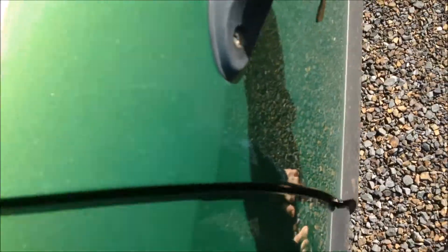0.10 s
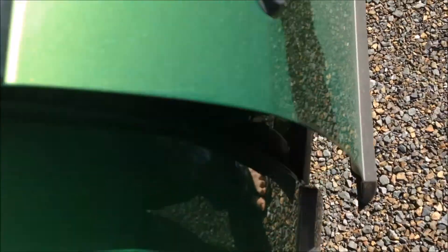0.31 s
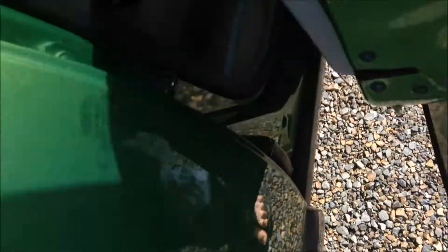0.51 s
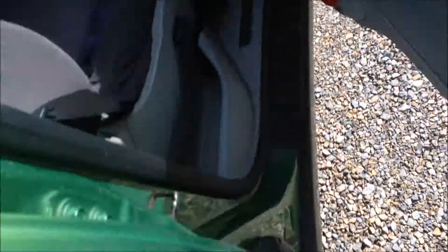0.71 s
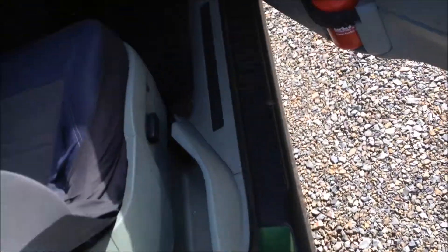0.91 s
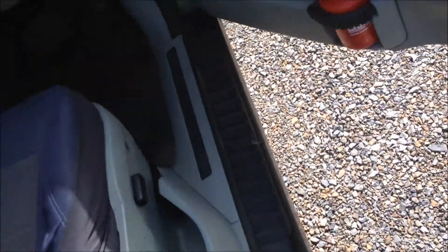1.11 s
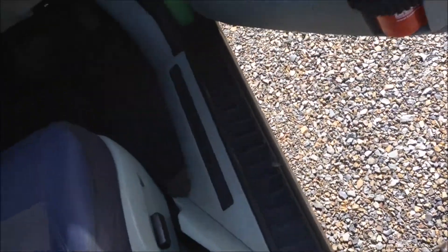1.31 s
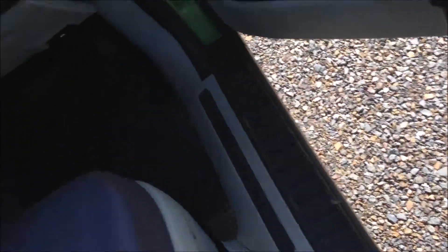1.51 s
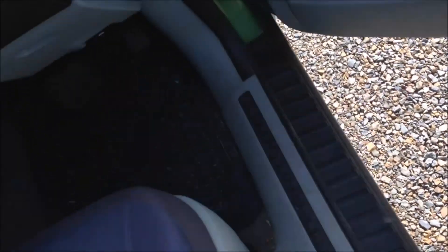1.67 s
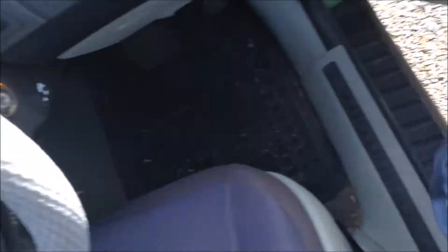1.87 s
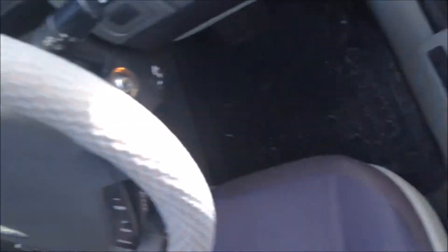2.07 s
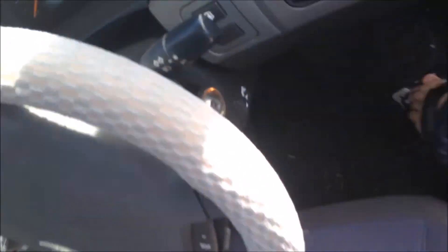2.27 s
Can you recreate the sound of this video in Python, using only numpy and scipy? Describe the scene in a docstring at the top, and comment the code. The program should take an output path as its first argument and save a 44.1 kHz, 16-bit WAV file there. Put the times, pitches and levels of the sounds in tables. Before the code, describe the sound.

A car door opens close by: light handle ticks, a loud hollow thump with a sharp latch snap, then two gravel crunches, soft bumps of climbing in, a brief key clink and faint cloth, outdoors, close mono microphone.

```python
"""First a car door handle ticks close by, then the door pops free with a hollow thump and the latch snaps.
Two steps crunch on gravel, soft bumps follow as someone climbs in, keys clink and clothing slides,
all over a faint outdoor background.
Knocks are short pushes that set damped tones ringing. Scrapes, crunches, clinks and cloth are grains
or noise, shaped in loudness and colour; the outdoor air is steady coloured noise."""
import sys
import numpy as np
from scipy import signal
from scipy.fft import rfft, irfft
from scipy.io import wavfile

SR = 44100
rng = np.random.default_rng(int(sys.argv[2]) if len(sys.argv) > 2 else 0)


def to_wav(s):
    """Save 16-bit WAV."""
    ch = np.atleast_2d(s).T  # columns
    pcm = np.round(np.clip(ch, -1, 1) * 32767)  # PCM
    wavfile.write(sys.argv[1], SR, pcm.astype(np.int16))


N = 105840  # samples, 2.4 s

# The door jumps off its catch and seal. Each row: start in seconds, level in dB, contact in seconds.
DOOR_BLOWS = [(0.1967, -27, 0.0037), (0.2025, -6, 0.0032), (0.2114, -12, 0.0015), (0.2176, -11, 0.0006),
              (0.2396, -18, 0.0006), (0.2755, -21, 0.0043), (0.3321, -30, 0.0035)]
# Tones of door skin and cavity. Each row: pitch in Hz, level in dB, time to fall 60 dB in seconds.
DOOR_MODES = [(55, -10, .16), (105, -23, .4), (131, -8, .17), (158, -5, .32), (182, -13, .38),
              (209, -3, .21), (261, -1, .13), (290, -5, .17), (346, -24, .4), (385, -9, .21),
              (450, -8, .09), (556, -12, .17), (824, -18, .1), (1046, -22, .09)]


def door_boom():
    """Blows make the hollow panel ring; it radiates little deep bass."""
    return highpass(ring(pushes(DOOR_BLOWS), DOOR_MODES), hz=90)


# The loosened panel shudders. Each row: peak in seconds, level in dB, rise in seconds, fall in seconds.
SHUDDERS = [(.295, -33, 0.15, 0.083), (.368, -49.5, 0.053, 0.4)]
# Tone colour of the shudder. Each row: frequency in Hz, relative level in dB.
SHUDDER_COLOUR = [(50, -29), (95, 9), (170, -21), (260, 15), (380, -33), (700, -22), (1500, -65),
                  (5000, -83)]


def door_shudder():
    """The loose panel shudders on: low noise that swells and fades."""
    return colour(rng.standard_normal(N) * swells(SHUDDERS), SHUDDER_COLOUR)


# Latch and seal scrape apart. Each row: peak in seconds, level in dB, rise in seconds, fall in seconds.
SCRAPES = [(.207, -31, 0.0038, .05), (.215, -23.5, 0.064, 0.033), (.235, -20, .02, 0.087),
           (.27, -39.5, .03, 0.53)]
# Tone colour of the scrape. Each row: frequency in Hz, relative level in dB.
SCRAPE_COLOUR = [(150, 3), (500, 10), (700, -2.5), (1000, 1), (1500, -2.5), (2000, -9), (2350, -4.5),
                 (2800, -7.5), (3700, -12.5), (6000, -21.5), (10000, -25.5), (15500, -35)]


def door_scrape():
    """Many tiny uneven contacts make the scrape of latch and seal."""
    return colour(grit(6600, spread_db=7) * swells(SCRAPES), SCRAPE_COLOUR)


# The latch snaps back. Each row: peak in seconds, level in dB, ring time in seconds.
LATCH_SNAPS = [(.2492, -35, .025), (.2539, -18, .014), (.2576, -21, .035)]
# Tone colour of the snaps. Each row: frequency in Hz, relative level in dB.
SNAP_COLOUR = [(400, -19), (1150, 5.5), (1800, -9), (2400, 7.5), (3300, -6), (5000, -6), (6700, -8),
               (7700, 1.5), (9900, -3), (11500, -9), (13300, -22), (15500, -25)]
# Tones of the latch metal. Each row: pitch in Hz, level in dB, time to fall 60 dB in seconds.
LATCH_MODES = [(1104, -10, .05), (1185, -7, .06), (2291, -3, .055), (2519, -3, .055), (2826, -9, .05),
               (7600, -2, .03), (7919, -2, .03), (8888, -3, .025), (10100, -2, .035)]


def latch():
    """The sprung latch gives sharp bursts of noise, and each one also sets its metal ringing briefly."""
    ring_db = -21  # the pushes relative to the snaps
    strikes = pushes([(at, db + ring_db, 2 / SR) for at, db, _ in LATCH_SNAPS])
    return clicks(LATCH_SNAPS, SNAP_COLOUR, rise_s=0.00079) + ring(strikes, LATCH_MODES)


# Ticks of the handle linkage. Each row: peak in seconds, level in dB, ring time in seconds.
LINKAGE_TICKS = [(.0973, -34, 0.031), (.1327, -32.5, 0.039), (.1395, -38, .06), (.152, -32.5, 0.038),
                 (.1562, -38, 0.11), (.2322, -48, 0.013), (.2897, -53, 0.0049), (.364, -42.5, 0.15),
                 (.437, -36.5, 0.021), (.4648, -38, 0.045)]
# Tone colour of the ticks. Each row: frequency in Hz, relative level in dB.
TICK_COLOUR = [(200, 26), (600, 3.5), (1000, 12.5), (1600, 5.5), (3500, 2), (5000, -4), (6300, 1.5),
               (8000, -3), (10200, 4), (11500, -7), (13300, -5), (15500, -16)]
# The handle reaches its stop. Each row: start in seconds, level in dB, contact in seconds.
HANDLE_KNOCKS = [(.1512, -30.5, 0.00045), (.1563, -23.5, 0.0011)]
# Tones of the handle. Each row: pitch in Hz, level in dB, time to fall 60 dB in seconds.
HANDLE_MODES = [(172, -12, .1), (320, 0, .04), (400, -5, .03), (585, -5, .04), (808, -12, .03),
                (975, -8, .022)]


def handle():
    """The linkage ticks in short noise bursts and the handle rings as it knocks on its stop."""
    ticks = clicks(LINKAGE_TICKS, TICK_COLOUR, rise_s=0.00035)
    return ticks + ring(pushes(HANDLE_KNOCKS), HANDLE_MODES)


# A shoe presses into gravel. Each row: peak in seconds, level in dB, rise in seconds,
# fall in seconds, bright stones in dB relative to that level.
CRUNCHES = [(0.429, -47.5, 0.06, 0.17, -1.5), (0.463, -49.5, 0.05, 0.019, 1.5),
            (0.496, -55, 0.11, 0.18, 8.5), (0.527, -34.5, 0.1, 0.035, 1.5), (.531, -32.5, 0.019, 0.084, -2),
            (0.559, -35, 0.06, 0.045, -16), (0.578, -46, 0.051, .07, -27), (0.544, -43, .005, .03, -5),
            (0.638, -45, 0.15, 0.2, -19), (0.658, -40.5, .01, 0.34, -25), (0.7144, -29, 0.018, 0.065, -18),
            (0.683, -36.5, 0.037, 0.23, -25), (.727, -27, .02, 0.047, -20.5),
            (0.74, -27.5, .03, 0.069, -22), (.75, -47, 0.011, 0.038, -20), (.78, -52.5, 0.041, 0.23, -29)]
# Tone colour of stones under the sole, also used for snaps. Each row: frequency in Hz, relative level in dB.
GRAVEL_COLOUR = [(200, -16.5), (600, -17), (850, -8.5), (1100, -1.5), (1300, 3), (1700, -2), (2100, -11),
                 (2500, -8.5), (2900, -15), (3350, -9), (4000, -14), (5200, -20.5), (7000, -33),
                 (15000, -40)]
# Tone colour of the loose bright stones. Each row: frequency in Hz, relative level in dB.
STONE_COLOUR = [(800, -20), (1800, 3.5), (3800, 0), (5000, -5.5), (5900, 1), (7500, -7.5), (10000, -17.5),
                (15000, -33)]
# Hollow tones of the packed stones. Each row: pitch in Hz, level in dB, time to fall 60 dB in seconds.
BED_MODES = [(1033, -2, .09), (1190, -11, 0.083), (1193, 4, 0.069), (1260, -8, 0.063), (1316, -1, 0.11),
             (1520, -24, 0.05), (1825, -3, 0.077), (3170, -9, .02)]
# Single stones snap together. Each row: peak in seconds, level in dB, ring time in seconds.
STONE_SNAPS = [(.4648, -35.5, 0.012), (.513, -27.5, 0.015), (.5607, -44, 0.02), (.6487, -34, 0.019),
               (.6898, -25, 0.017), (.724, -25, 0.027), (.7497, -29, 0.016)]


def gravel():
    """Stones grind under the sole and sound the hollow bed; loose ones click brighter and some snap."""
    under = swells(first_four(CRUNCHES)) * grit(4900, spread_db=6)
    loose = swells(shifted(CRUNCHES)) * grit(2500, spread_db=0)
    snaps = clicks(STONE_SNAPS, GRAVEL_COLOUR, rise_s=.002)
    bed = undb(-34) * ring(under, BED_MODES)
    return colour(under, GRAVEL_COLOUR) + bed + colour(loose, STONE_COLOUR) + snaps


# Heel, legs and body bump ground, sill and floor.
# Each row: start in seconds, level in dB, contact in seconds.
BUMPS = [(.574, -34, 0.0079), (.7175, -22, 0.0031), (.7275, -23, 0.0031), (.7365, -25, 0.009),
         (.7475, -34, 0.0015), (.79, -29.5, 0.011), (.8025, -62, 0.0018), (.912, -37, 0.0021),
         (.9352, -34, 0.0027), (.9405, -26.5, 0.0057), (.9795, -34, 0.00094), (1.0405, -34.5, 0.0023),
         (1.0775, -31, 0.0046), (1.0825, -25.5, 0.0019), (1.1345, -38, 0.0045), (1.168, -43.5, 0.0027),
         (1.262, -45, 0.0076), (1.335, -48.5, 0.004), (1.433, -28.5, 0.0098), (1.449, -30.5, 0.011),
         (1.469, -36, 0.0047), (1.652, -49, 0.00067), (1.677, -54, 0.003), (1.8045, -40, 0.0036),
         (1.8102, -43.5, 0.0019)]
# Tones of the cabin. Each row: pitch in Hz, level in dB, time to fall 60 dB in seconds.
CABIN_MODES = [(105, -15.5, 0.11), (154.5, -7, 0.11), (193.6, 0.5, 0.05), (284, -6, 0.054),
               (332.5, -5, 0.13), (485, -2.5, 0.045), (520, -24, .06), (710, -23, 0.037)]
# A shoe knocks on the plastic sill. Each row: start in seconds, level in dB, contact in seconds.
SILL_KNOCKS = [(.9125, -38.5, 0.00033), (1.0812, -30.5, 0.00094), (1.0852, -38.5, 0.00073),
               (1.57, -46, 0.0002), (1.9495, -50.5, 0.00039)]
# Tones of the sill. Each row: pitch in Hz, level in dB, time to fall 60 dB in seconds.
SILL_MODES = [(355, -4, 0.053), (465, -10, 0.044), (605, -3.5, 0.048), (711, -3.5, 0.062), (800, -8, 0.019),
              (1620, -32, .025)]


def bumps():
    """Soft bumps make the cabin ring low; harder shoe knocks ring the plastic sill."""
    cabin = highpass(ring(pushes(BUMPS), CABIN_MODES), hz=65)
    return cabin + ring(pushes(SILL_KNOCKS), SILL_MODES)


# Shoe and trouser leg scuff the trim. Each row: peak in seconds, level in dB, rise in seconds,
# fall in seconds, raspy part in dB relative to that level.
SCUFFS = [(0.917, -38, .01, 0.044, -8.5), (0.926, -37.5, 0.16, 0.2, -16), (0.985, -42, 0.09, 0.21, -6.5),
          (1.047, -42.5, 0.061, 0.096, -10), (1.083, -33.5, 0.058, 0.059, -38),
          (1.115, -45.5, 0.091, 0.12, -22.5), (1.25, -68.5, 0.047, 0.45, 9),
          (1.572, -51.5, 0.0042, 0.1, -17), (1.951, -48.5, 0.096, 0.044, -1.5),
          (2.093, -51.5, 0.36, 0.15, 2)]
# Tone colour of the dull part. Each row: frequency in Hz, relative level in dB.
SCUFF_COLOUR = [(60, -44), (160, 7.5), (330, -2), (550, 0), (750, -8.5), (1000, -33), (2000, -24.5),
                (8000, -43)]
# Tone colour of the raspy part and the taps. Each row: frequency in Hz, relative level in dB.
RASP_COLOUR = [(400, -8.5), (900, 0), (1350, 0.5), (1900, 0.5), (2500, -11), (4000, -16.5), (8000, -25),
               (15000, -59)]
# Light plastic taps and creaks of the trim. Each row: peak in seconds, level in dB, ring time in seconds.
TRIM_TAPS = [(.9128, -50, 0.039), (.932, -52, 0.018), (.9775, -43.5, 0.033), (.9835, -43, 0.034),
             (.989, -47, 0.024), (1.0338, -43, 0.048), (1.112, -56, 0.036), (1.779, -48, 0.023)]


def trim():
    """Scuffs have a dull body of smooth noise and a raspy edge of grains; the plastic taps and creaks."""
    body = swells(first_four(SCUFFS)) * rng.standard_normal(N)
    rasp = swells(shifted(SCUFFS)) * grit(3000, spread_db=9)
    taps = clicks(TRIM_TAPS, RASP_COLOUR, rise_s=0.0038)
    return taps + colour(body, SCUFF_COLOUR) + colour(rasp, RASP_COLOUR)


# Keys shift in a closed hand. Each row: peak in seconds, level in dB, rise in seconds,
# fall in seconds, bright jingle in dB relative to that level.
KEY_SHIFTS = [(1.568, -43.5, 0.0067, 0.043, -9), (1.597, -52.5, 0.14, 0.11, -1),
              (1.618, -43.5, 0.042, 0.1, -25), (1.6313, -38, 0.024, 0.075, -35),
              (1.68, -50, 0.038, 0.06, -5), (1.6952, -31, 0.021, 0.031, -12),
              (1.702, -45.5, 0.041, 0.13, -8), (1.759, -52.5, 0.18, 0.11, -2.5)]
# Tone colour of the clinks. Each row: frequency in Hz, relative level in dB.
KEY_COLOUR = [(300, -13), (900, -5), (1300, -2.5), (1700, 2), (2400, 3.5), (3300, 0.5), (4500, -13.5),
              (7000, -19), (10000, -31), (15000, -48)]
# Tone colour of the jingle. Each row: frequency in Hz, relative level in dB.
JINGLE_COLOUR = [(1500, -17), (3300, 4.5), (5000, 3), (6800, 0), (9500, -5), (12000, -11), (15000, -22)]
# Single keys strike each other. Each row: start in seconds, level in dB, contact in seconds.
KEY_STRIKES = [(1.5698, -36, .0001), (1.6298, -18, 0.00017), (1.6943, -11.5, 0.00016)]


def keys():
    """Clusters of small contacts and single strikes make the clinks, with a thin bright jingle on top."""
    clinks = grit(4000, spread_db=3) * swells(first_four(KEY_SHIFTS))
    jingle = grit(3000, spread_db=-1.5) * swells(shifted(KEY_SHIFTS))
    return colour(clinks + pushes(KEY_STRIKES), KEY_COLOUR) + colour(jingle, JINGLE_COLOUR)


# Clothing slides over the seat. Each row: peak in seconds, level in dB, rise in seconds, fall in seconds.
SLIDES = [(1.128, -53.5, 0.17, 0.069), (1.255, -77, 0.12, 0.26), (1.469, -57, 0.035, 0.076),
          (2.04, -50, 0.34, 0.31), (2.15, -51.5, 1, 0.57)]
# Tone colour of the cloth. Each row: frequency in Hz, relative level in dB.
CLOTH_COLOUR = [(100, -7), (550, -2), (900, -4), (1400, 1), (3000, 1), (7000, -4), (10000, -8.5),
                (15000, -18.5)]


def clothing():
    """Fabric hisses over the upholstery in very dense tiny contacts."""
    return colour(grit(14000, spread_db=5.5) * swells(SLIDES), CLOTH_COLOUR)


def reflections(x, wet_db, t60):
    """Short scatter off the car body and the open cabin: a fading noise tail without bass."""
    t = np.arange(SR // 2) / SR
    tail = rng.standard_normal(len(t)) * np.exp(-np.log(1000) * t / t60)
    tail = highpass(tail, hz=577)
    return x + undb(wet_db) * signal.fftconvolve(x, tail / np.linalg.norm(tail))[:N]


# Tone colour of the outdoor air. Each row: frequency in Hz, relative level in dB.
OUTDOOR_COLOUR = [(20, 7), (55, 0.5), (100, 0), (170, 0.5), (300, -5), (700, -12.5), (1500, -15),
                  (2600, -14.5), (6000, -19.5), (15000, -27)]


def outdoors():
    """Still outdoor air: faint steady noise, strongest in the bass."""
    return undb(-55) * colour(rng.standard_normal(N), OUTDOOR_COLOUR)


def undb(db):
    """Decibels to gain."""
    return 10 ** (np.asarray(db) / 20)


def first_four(rows):
    """Drop the fifth column, the level of the bright part."""
    return [row[:4] for row in rows]


def shifted(rows):
    """Move each level by the fifth column to get the bright part."""
    return [(at, db + bright, rise, fall) for at, db, rise, fall, bright in rows]


def pushes(rows):
    """One rounded push per row: the longer the contact, the duller the blow."""
    t = np.arange(N) / SR
    out = np.zeros(N)
    for at, db, contact in rows:
        progress = np.clip((t - at) / max(contact, 2 / SR), 0, 1)
        push = np.sin(np.pi * progress) ** 2
        out += undb(db) * push / push.sum()
    return out


def ring(x, modes):
    """Damped tones driven by x, like a struck object."""
    t = np.arange(SR) / SR
    response = np.zeros(SR)
    for hz, db, t60 in modes:
        fade = np.exp(-np.log(1000) * t / t60)
        response += undb(db) * np.sin(2 * np.pi * hz * t) * fade
    return signal.fftconvolve(x, response)[:N]


def swells(rows):
    """Loudness curve of all events, added as power; rise and fall each span 60 dB."""
    t = np.arange(N) / SR
    power = np.zeros(N)
    for at, db, rise, fall in rows:
        distance = np.minimum(np.maximum((at - t) / rise, (t - at) / fall), 10)
        power += undb(db) ** 2 * np.exp(-2 * np.log(1000) * distance)
    return np.sqrt(power)


def grit(rate, spread_db):
    """Tiny contacts at random moments, rate per second on average, of uneven size, with unit power."""
    chance, size, sign = rng.random(N), rng.standard_normal(N), rng.choice([-1, 1], N)
    x = (chance < rate / SR) * sign * undb(spread_db * np.clip(size, -2, 2))
    return x / x.std()


def clicks(rows, points, rise_s):
    """Sharp contacts: coloured noise bursts that rise fast and die over their ring time."""
    envelope = swells([(at, db, rise_s, fall) for at, db, fall in rows])
    return colour(rng.standard_normal(N) * envelope, points)


def colour(x, points):
    """Filter of unit power through (Hz, dB) points, with no sound ahead of its cause."""
    size = 4096
    hz, db = np.array(points, float).T
    bins_hz = np.arange(size // 2 + 1) * SR / size
    gain = undb(np.interp(np.log(bins_hz + 1), np.log(hz), db))
    # folding the cepstrum puts the energy as early as possible (minimum phase)
    cepstrum = irfft(np.log(gain))
    cepstrum[1:size // 2] *= 2
    cepstrum[size // 2 + 1:] = 0
    response = irfft(np.exp(rfft(cepstrum)))
    return signal.fftconvolve(x, response / np.linalg.norm(response))[:N]


def highpass(x, hz):
    """Second-order loss of bass."""
    return signal.sosfilt(signal.butter(2, hz, "high", fs=SR, output="sos"), x)


def scene():
    """Door, steps and climbing in with short reflections, over still outdoor air."""
    door = door_boom() + door_shudder() + door_scrape() + latch() + handle()
    person = gravel() + bumps() + trim() + keys() + clothing()
    near = reflections(door + person, wet_db=-11.5, t60=0.058)
    return (near + outdoors())[None]  # one channel


def record(dry):
    """The microphone loses the deepest bass and the top is cut steeply."""
    x = highpass(dry, hz=41)
    top_cut = signal.ellip(10, .2, 80, 15500, fs=SR, output="sos")  # ripple dB, rejection dB, edge Hz
    return signal.sosfilt(top_cut, x)


dry = scene()
out = record(dry)
to_wav(out)
```